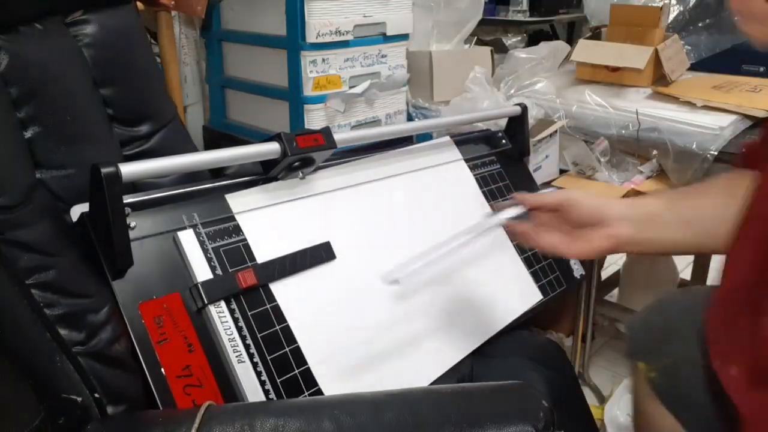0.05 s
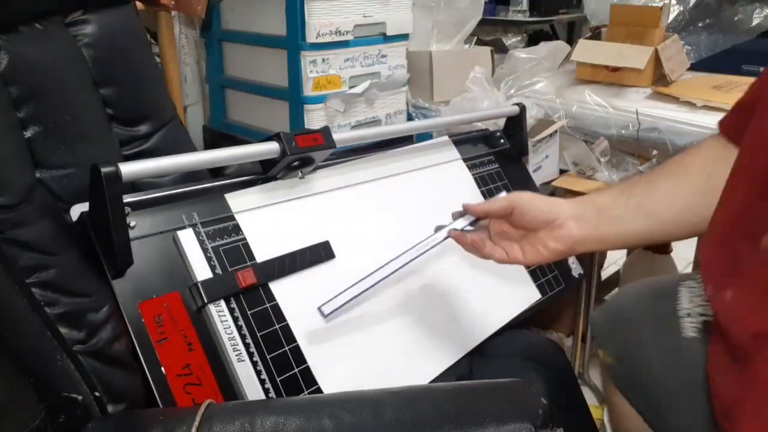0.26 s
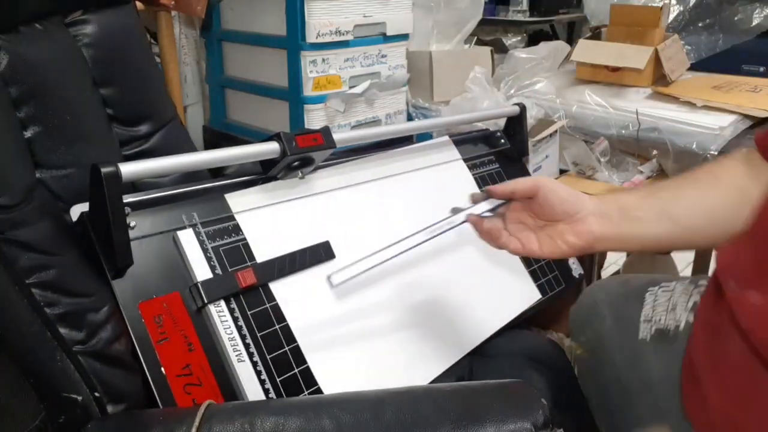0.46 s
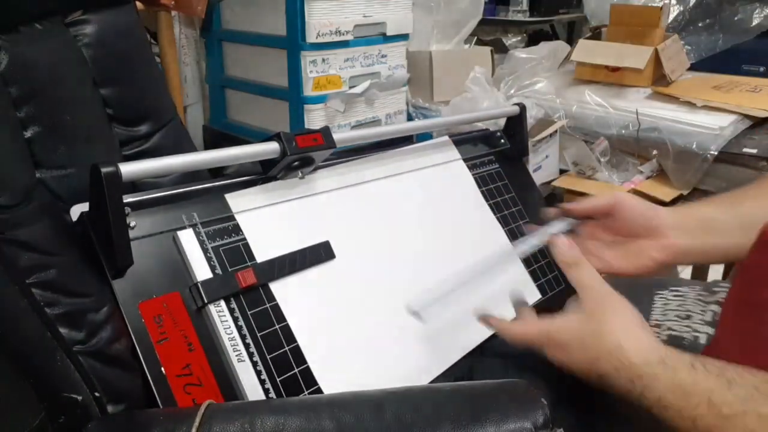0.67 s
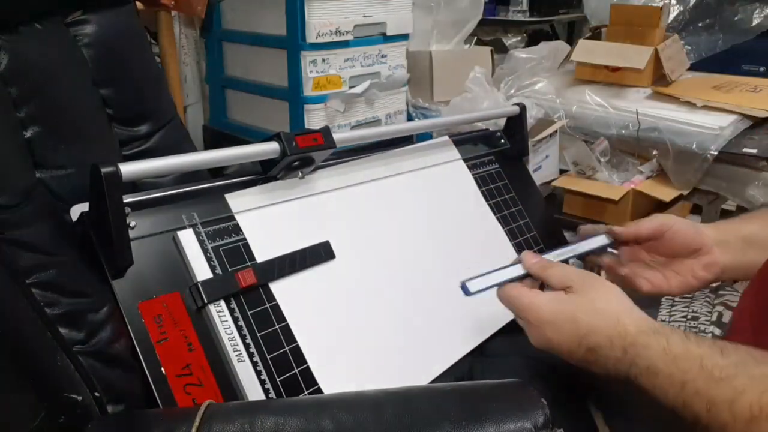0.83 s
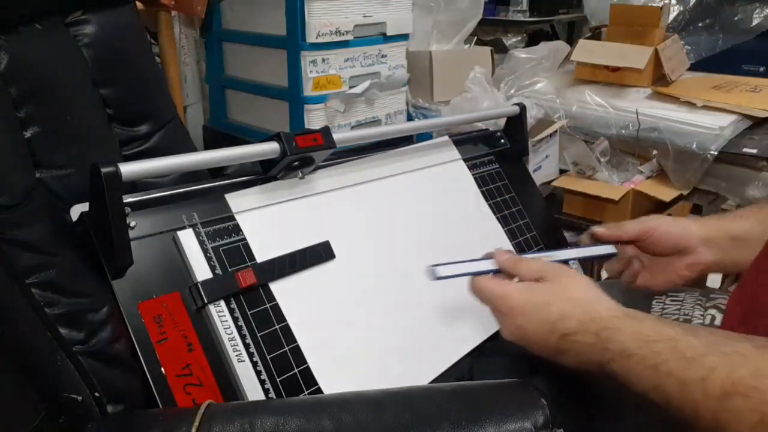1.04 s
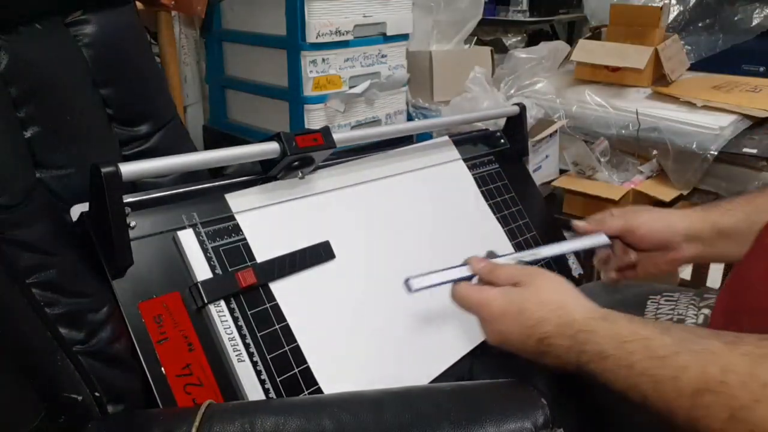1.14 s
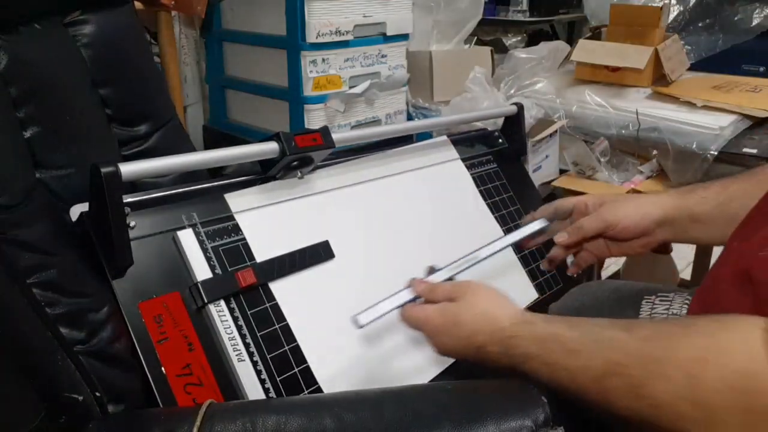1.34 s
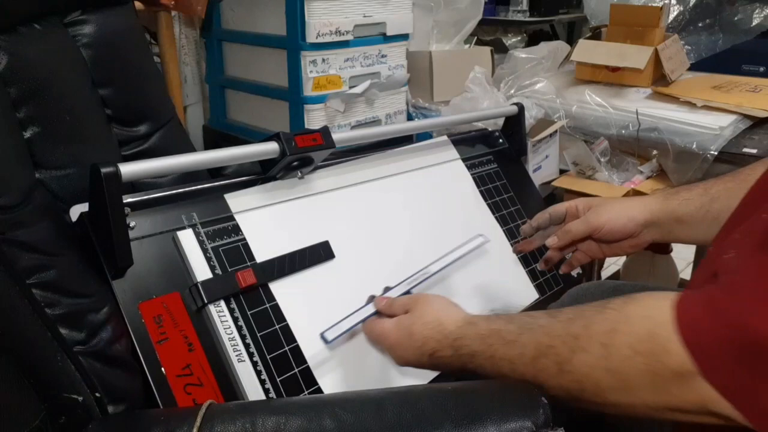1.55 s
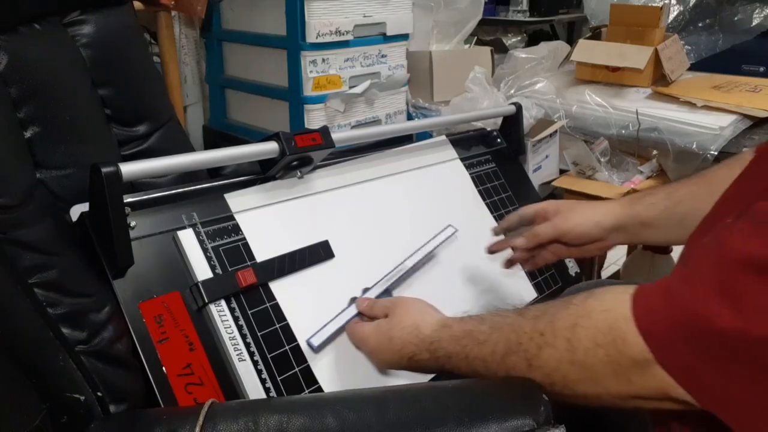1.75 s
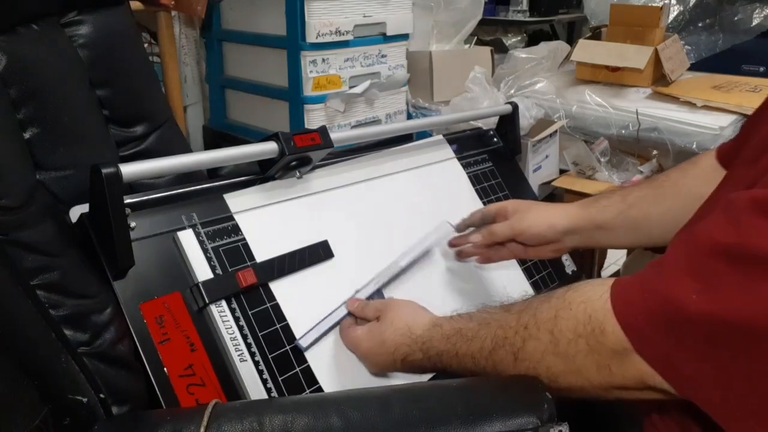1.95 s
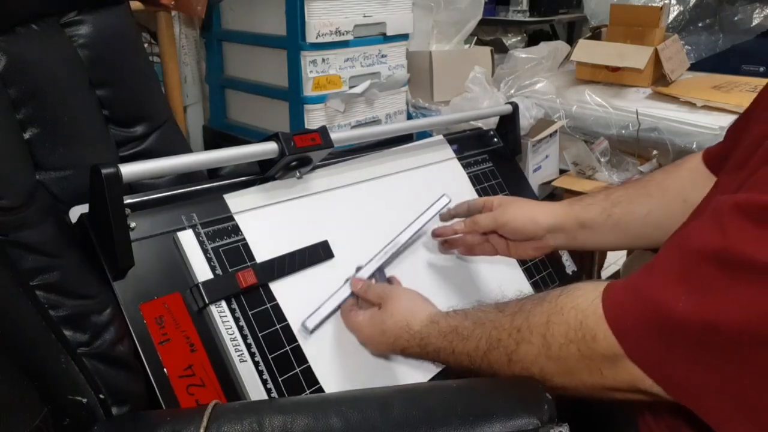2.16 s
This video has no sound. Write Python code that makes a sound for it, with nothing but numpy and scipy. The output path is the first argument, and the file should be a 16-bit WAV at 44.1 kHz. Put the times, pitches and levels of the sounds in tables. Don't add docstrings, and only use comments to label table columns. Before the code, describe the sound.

A steel ruler clicks and drags with a brief low judder, then knocks hard on a trimmer bed; soft hand rubbing follows, ending in a faint tap and rattle, close-miked in a small room with motor hum.

```python
import sys
import numpy as np
from scipy import signal
from scipy.fft import rfft, irfft, next_fast_len
from scipy.io import wavfile
from scipy.ndimage import map_coordinates

SR = 44100
rng = np.random.default_rng(int(sys.argv[2]) if len(sys.argv) > 2 else 0)


def boost(x):
    u = np.asarray(x, float) / 20
    return 10 ** u


def int16_out(signal):
    q = np.round(np.clip(np.atleast_2d(signal).T, -1, 1) * 32767)
    wavfile.write(sys.argv[1], SR, q.astype(np.int16))


N = 97020
T = np.arange(N) / SR


# f/Hz, level/dB, decay t60/s
BED_MODES = [(108.6, -18.5, 0.51), (153.9, -7, 0.22), (269.4, 2, 0.12), (331.5, -9, 0.13),
             (466.5, -29.5, 0.35), (528.6, -11.5, 0.12), (551, -9, 0.11), (774, -7.5, .14),
             (975, -48, 0.22), (987, -12, 0.11), (1354, -12, 0.13), (1636, -13, 0.13)]
# f/Hz, level/dB
CLATTER_COLOUR = [(60, -23), (140, -8.5), (500, -14), (1100, -25.5), (1850, -30), (2800, -31), (7000, -43),
                  (15500, -72)]
# f/Hz, t60/s
CLATTER_DECAY = [(90, 0.39), (300, 0.17), (1500, 0.27), (5000, 0.2), (12000, 0.32)]
KNOCK_S = .4457


def bed_ring(start_s):
    out = np.zeros(N)
    for hz, db, t60 in BED_MODES:
        out += boost(db) * np.sin(2 * np.pi * hz * (T - start_s)) * dying(start_s, t60, 0.00094)
    return out


def knock():
    corner_lead_s, corner_db = 0.00258, -11
    body = boost(corner_db) * bed_ring(KNOCK_S) - bed_ring(KNOCK_S + corner_lead_s)
    crack = click(KNOCK_S + 0.00092, 0.0032)
    clatter = burst(KNOCK_S, CLATTER_COLOUR, CLATTER_DECAY, 0.001)
    return boost(-6.5) * body + boost(-2) * crack + boost(-11) * clatter


# t/s, slip rate f/Hz, level/dB, brightness level/dB
DRAG = [
    (.2, 225.1, -56, -12),
    (.222, 215.6, -30.5, 2.5),
    (.236, 196.3, -25.5, 6),
    (.255, 196.7, -32, 7),
    (.27, 194, -27.5, 3.5),
    (.29, 201.2, -32.5, -13.5),
    (.335, 208, -41.5, -7),
    (.36, 206, -60, -6),
]
# f/Hz, width/Hz, level/dB
EDGE_MODES = [(182, 95, 0), (364, 23, 2), (557, 61, 1.5), (812, 64, -6.5), (954, 67, -8.5),
              (1620, 500, -12.5)]


def judder():
    jitter, scatter_db, grit, blunt_hz = .06, 1.8, .045, 2300
    turns = np.cumsum(curve(DRAG) * (1 + jitter * wobble(150))) / SR
    slips = np.diff(np.floor(turns), prepend=0) * boost(scatter_db * wobble(196.6))
    slips = slips + grit * rng.standard_normal(N)

    def edge_response(f):
        modes = [(-1) ** k * boost(db) * peak(f, hz, width) for k, (hz, width, db) in enumerate(EDGE_MODES)]
        return peak(f, 580, blunt_hz) * np.array(modes)

    parts = filtered(slips, edge_response)
    upper = unit(parts[1:].sum(axis=0)) * boost(curve(DRAG, index=3))
    touching = (T > DRAG[0][0]) * (T < DRAG[-1][0])
    return (unit(parts[0]) + upper) * boost(curve(DRAG, index=2)) * touching


# t/s, click level/dB, body level/dB, body f/Hz, body t60/s
CONTACTS = [(0.079, -47.5, -52, 960, 0.034), (0.0918, -46, -35, 810, 0.049),
            (0.1061, -48, -41, 1200, 0.091), (.1298, -8, -29, 760, .07), (.146, -50, -36, 800, .04),
            (.154, -50, -37, 850, .04), (.165, -50, -42, 800, .05), (.131, -60, -40.5, 234, 0.14),
            (.2135, -31, -32.5, 3870, 0.045), (0.231, -23, -28, 2900, 0.045), (0.356, -55, -31, 261, 0.14),
            (.362, -62, -33.5, 110, 0.13), (0.423, -56, -37, 2900, 0.058), (1.749, -50, -51, 800, .05),
            (1.905, -46, -46, 6500, .015), (1.93, -44, -50, 6000, .015), (1.9575, -60, -45, 6800, .02),
            (1.957, -40, -47, 1300, .05), (2.0125, -27, -43, 480, .17), (1.959, -65, -47, 330, 0.054),
            (2.171, -70, -50, 167, 0.13)]


def taps(rows):
    out = np.zeros(N)
    for s, click_db, body_db, hz, t60 in rows:
        noise = rng.standard_normal(N)
        rough = unit(filtered(noise, lambda f: peak(f, hz, hz / 2) * peak(f, hz, 0.71 * hz)))
        struck = 2 * np.sin(2 * np.pi * hz * (T - s)) * dying(s, t60, 0.00042)
        body = (0.65 * rough + struck) * dying(s, t60, 0.00081)
        out += boost(click_db) * click(s, .007) + boost(body_db) * body
    return out


# f/Hz, level/dB
RATTLE_COLOUR = [(200, -28), (480, -19), (900, -18.5), (1850, -9.5), (2500, -13), (3870, -9), (7000, -18.5),
                 (12000, -31)]
# f/Hz, t60/s
RATTLE_DECAY = [(300, .2), (2000, .2), (5000, .17), (10000, .08)]


def rattle():
    shiver_db = 1.2 * wobble(150)
    return boost(-37.5 + shiver_db) * burst(2.0122, RATTLE_COLOUR, RATTLE_DECAY, .0005)


def ping():
    hz, start_s, t60, rise_s = 5295, 2.168, .065, .009
    return boost(-43) * np.sin(2 * np.pi * hz * T) * dying(start_s, t60, rise_s)


# t/s, level/dB
RUB_LEVEL = [(0, -54.5), (.05, -62.5), (.088, -62.5), (.1, -49), (.128, -54), (.15, -40), (.2, -44.5),
             (.235, -37.5), (.3, -43), (.35, -38.5), (.41, -46), (.44, -43), (.5, -48), (.6, -56.5),
             (.75, -55), (.95, -54), (1.05, -63.5), (1.15, -59.5)]
# t/s, level/dB
RUB_CHANGE = [
    (1.17, 0),
    (1.22, -7.5),
    (1.27, -5.5),
    (1.36, -20.5),
    (1.75, -18),
    (1.95, -4.5),
    (2.1, -12.5),
]
# f/Hz, level/dB
PAPER_COLOUR = [(250, -27), (500, -4), (1700, -6), (2900, -4), (6800, -4), (7900, -10), (12000, -12),
                (15500, -12.5)]


def rubbing():
    grain_db = 1.0 * wobble(25.63) + 1.48 * wobble(600)
    return hiss(PAPER_COLOUR) * boost(curve(RUB_LEVEL) + curve(RUB_CHANGE) + grain_db + 5.0)


# f/Hz, level/dB
AIR_COLOUR = [(25, -32), (45, -6), (130, -8.5), (500, -14), (680, -20), (6500, -36.5), (8200, -53),
              (15500, -45)]
# multiple of shaft rate, then level/dB at each of HUM_TIMES
MOTOR_ORDERS = [(1, -57, -57, -61, -61), (2, -61, -60, -63, -66), (4, -63, -61, -61, -54),
                (5.25, -62, -59, -63, -62), (7, -66, -60, -67, -66), (8, -62, -54, -68, -70)]
HUM_TIMES = [.4, 1.1, 1.55, 2.201]


def room_tone():
    shaft_hz, drift_hz_per_s = 43.87, -0.3066
    turns = np.cumsum(shaft_hz + drift_hz_per_s * T + 0.29 * wobble(5.59)) / SR
    hum = np.zeros(N)
    for order, *levels in MOTOR_ORDERS:
        order_db = np.interp(T, HUM_TIMES, levels) + 2.2 * wobble(9.16)
        hum += boost(order_db) * np.sin(2 * np.pi * order * turns)
    air_db = -57 + 6 * np.exp(-T) + .7 * wobble(6)
    return hum + hiss(AIR_COLOUR) * boost(air_db)


# f/Hz, t60/s
ROOM_DECAY = [(150, 0.21), (1000, 0.084), (8000, 0.067)]


def room(x):
    hz, t, z = signal.stft(rng.standard_normal((2, SR // 2)), SR, nperseg=256)
    decay = boost(-60 * t / along(ROOM_DECAY, hz)[:, None])
    tail = signal.istft(z * decay, SR, nperseg=256)[1]
    delayed = np.pad(x, (300, 0))[None]
    return signal.fftconvolve(delayed, tail / np.linalg.norm(tail[0]), axes=1)[:, :N]


def click(s, t60):
    kick = (np.arange(N) == round(s * SR)) + .3 * rng.standard_normal(N) * dying(s, t60, .0001)

    def bright(f):
        wide = peak(f, 3500, 3400)
        return 2 * wide * (0.12 + wide)

    return filtered(kick, bright)


def burst(s, spectrum, t60s, attack_s):
    hz, t, z = signal.stft(hiss(spectrum), SR, nperseg=256)
    decay = boost(-60 * np.maximum(t - s, 0) / along(t60s, hz)[:, None])
    tail = signal.istft(z * decay, SR, nperseg=256)[1][:, :N]
    return tail * (1 - np.exp(-np.maximum(T - s, 0) / attack_s))


# f/Hz, likeness 0-1
COHERENCE = [(60, 0.92), (400, 1), (900, 0.16), (2500, 0.18), (6000, 0), (14000, 1)]


def hiss(spectrum):
    closed = [(15, -120)] + list(spectrum)

    def mid_side(hz):
        angle = np.arccos(np.clip(along(COHERENCE, hz), -1, 1)) / 2
        return boost(along(closed, hz)) * [np.cos(angle), np.sin(angle)]

    mid, side = filtered(rng.standard_normal((2, N)), mid_side)
    return unit(np.array([mid + side, mid - side]))


def dying(s, t60, attack_s):
    t = np.maximum(T - s, 0)
    return (1 - np.exp(-t / attack_s)) * boost(-60 * t / t60)


def peak(f, hz, width_hz):
    return 1j * f * width_hz / (hz * hz - f * f + 1j * f * width_hz)


def filtered(x, response):
    m = next_fast_len(N + SR // 2)
    return irfft(rfft(x, m) * response(np.fft.rfftfreq(m, 1 / SR)), m)[..., :N]


def placed(x, lag_s, pan_db):
    side = np.array([[.5], [-.5]])
    return filtered(x * boost(2 * side * pan_db), lambda f: np.exp(-2j * np.pi * f * side * lag_s))


def wobble(rate):
    return map_coordinates(rng.standard_normal(int(N * rate / SR) + 4), [T * rate])


def curve(rows, index=1):
    rows = np.transpose(rows)
    return np.interp(T, rows[0], rows[index])


def along(points, hz):
    f, v = np.transpose(points)
    return np.interp(np.log(hz + 1), np.log(f + 1), v)


def unit(x):
    return x / np.sqrt(np.mean(x ** 2) + 1e-20)


def scene():
    early = taps([r for r in CONTACTS if r[0] < 1]) + judder()
    late = taps([r for r in CONTACTS if r[0] >= 1])
    moved = 1 / (1 + np.exp((0.8 - T) / 0.072))
    early_lag_s = -.00027
    near = placed(early + rubbing() * np.sqrt(1 - moved), early_lag_s, 1)
    near = near + placed(knock(), early_lag_s, 0.3)
    far = placed(rubbing() * np.sqrt(moved) + room_tone(), .00043, -1.2)
    settling = placed(late + rattle(), .00005, 0.23) + placed(ping(), 0, 4.0)
    return near + far + settling + boost(-12) * room(early + late)


def roll_off(x):
    return signal.sosfilt(signal.butter(12, 16600, fs=SR, output="sos"), x)


def record(dry):
    low_hz, top_hz = 51, 15700

    def band(f):
        treble_limit = np.clip((top_hz - f) / 120, .005, 1)
        return treble_limit * (1j * f / (low_hz + 1j * f)) ** 2

    mix = filtered(dry, band)
    return roll_off(mix)


dry = scene()
out = record(dry)
int16_out(out)
```